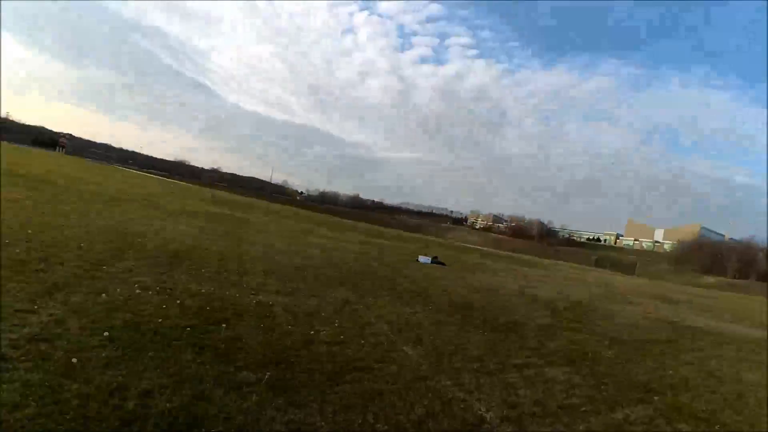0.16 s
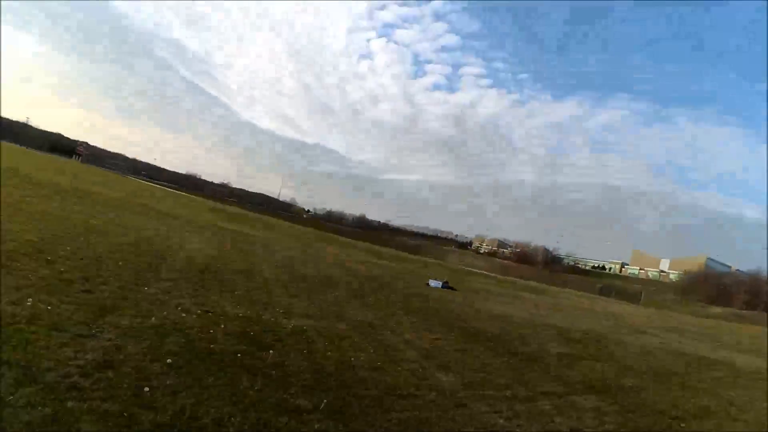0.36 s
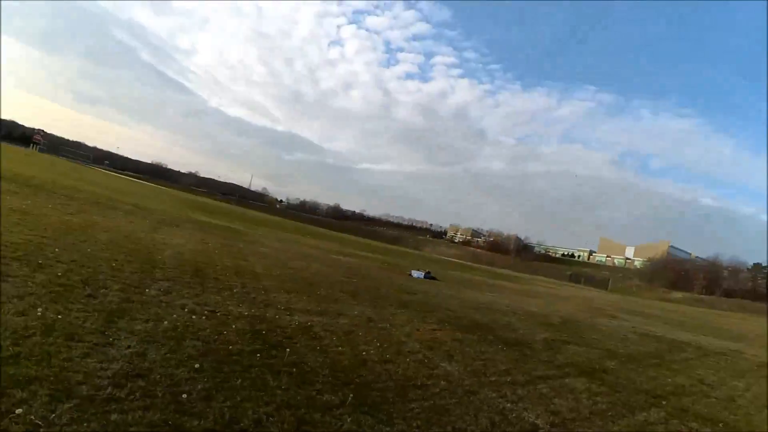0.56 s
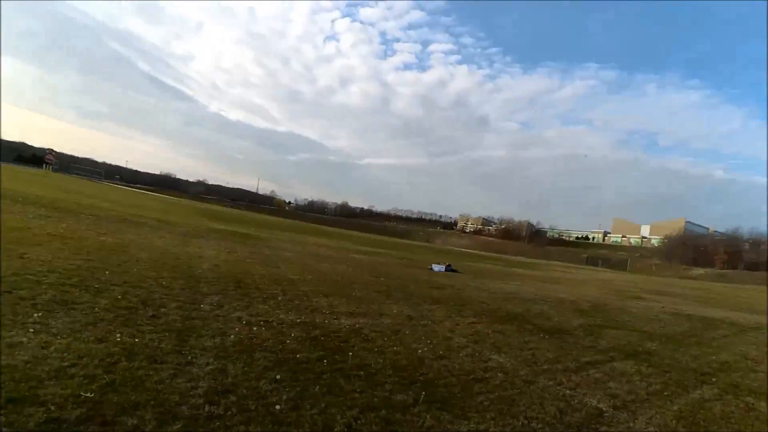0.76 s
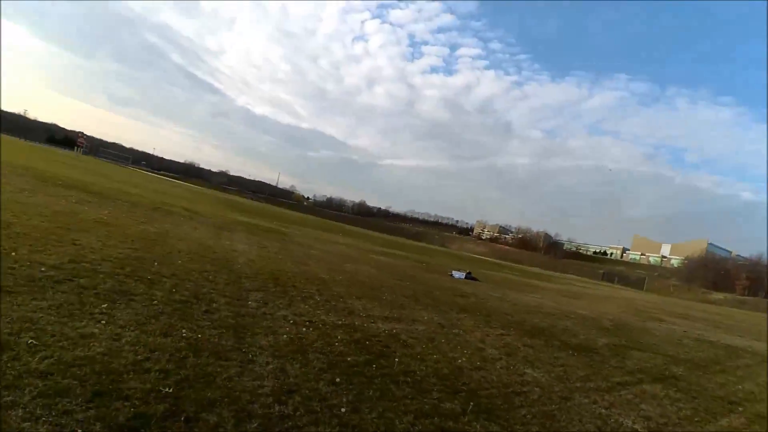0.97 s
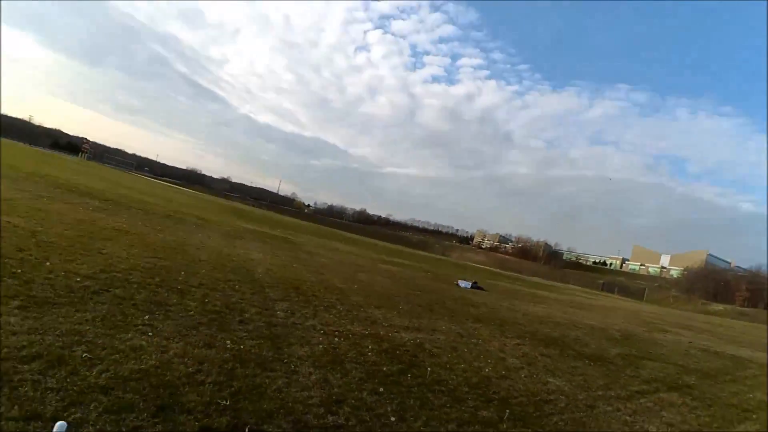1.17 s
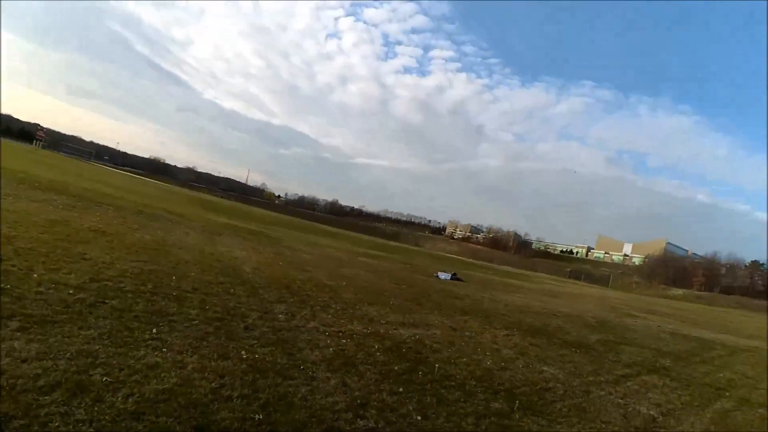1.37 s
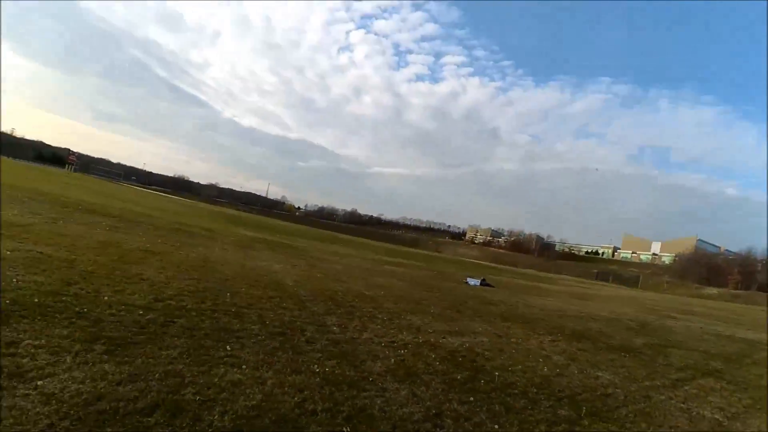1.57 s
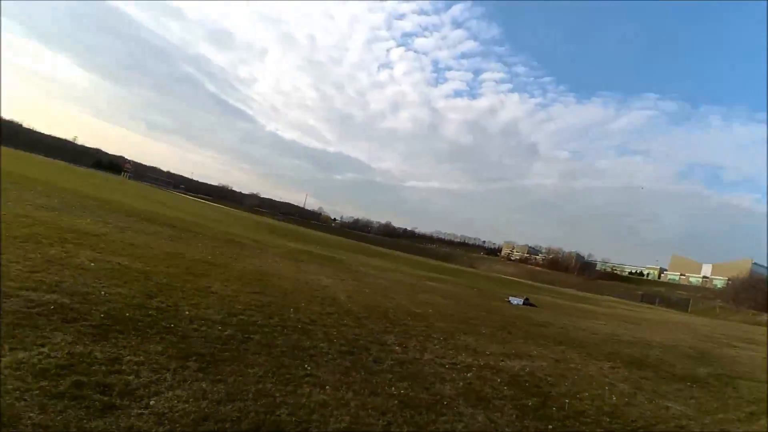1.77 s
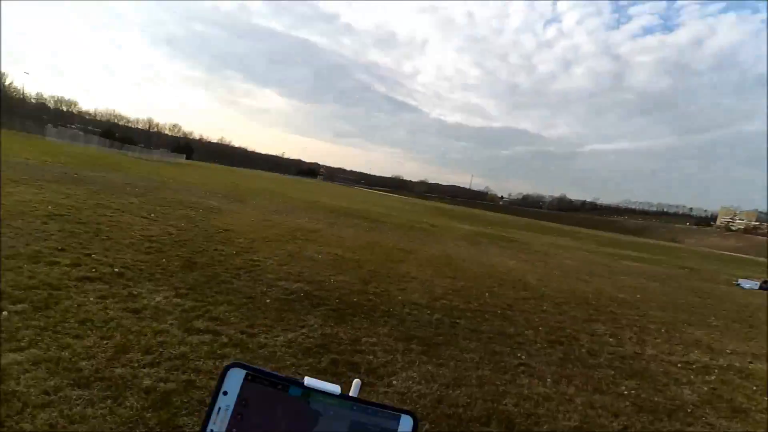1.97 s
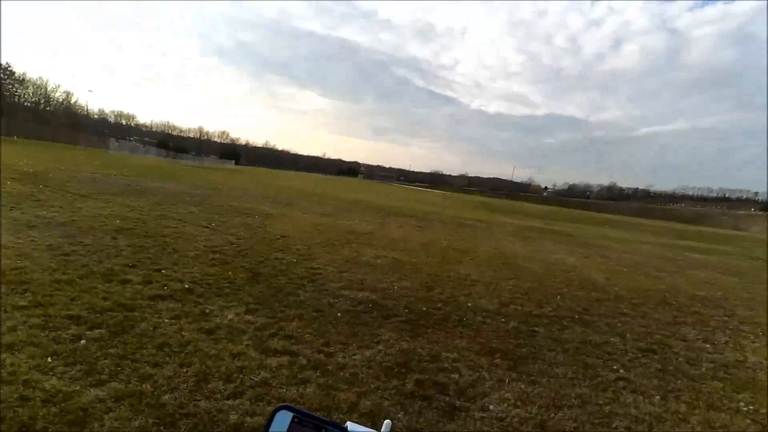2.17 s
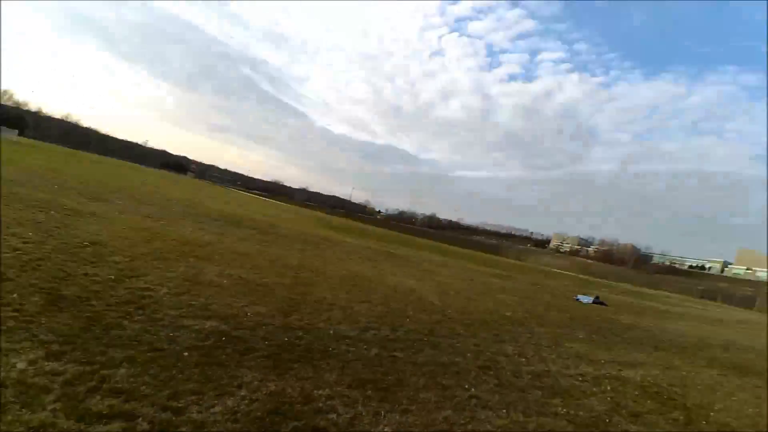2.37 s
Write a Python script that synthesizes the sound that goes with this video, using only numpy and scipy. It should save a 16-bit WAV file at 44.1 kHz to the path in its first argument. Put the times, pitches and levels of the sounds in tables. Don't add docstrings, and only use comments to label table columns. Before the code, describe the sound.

Wind buffets a microphone with low rumble and sudden pops, as plastic gear clacks now and then

```python
import sys
import numpy as np
from scipy import signal
from scipy.io import wavfile
from scipy.ndimage import uniform_filter1d

SR = 44100
rng = np.random.default_rng(int(sys.argv[2]) if len(sys.argv) > 2 else 0)


def wav_out(sig):
    wavfile.write(sys.argv[1], SR, np.round(np.clip(np.atleast_2d(sig).T, -1, 1) * 32767).astype(np.int16))


def voltage_ratio(level):
    return 10 ** (np.asarray(level, float) / 20)


N = 110250

# (time [s], buffet level [dB], pressure sway level [dB])
GUSTS = [(0, -27, -32.5), (.1, -27, -43), (0.132, -32, -33), (.23, -32, -14), (.36, -38, -28.5),
         (0.398, -33, -16.5), (.63, -45, -23.5), (0.692, -26.5, -26.5), (.86, -27.5, -22),
         (0.899, -36.5, -21.5), (1.05, -25.5, -18), (1.332, -36, -27), (1.382, -26, -25),
         (1.579, -29.5, -16.5), (1.662, -35.5, -22), (1.732, -24.5, -23), (1.95, -35.5, -22.5),
         (2.052, -31.5, -29.5)]
# (time [s], buffet level [dB], pressure sway level [dB])
CLOSING_RUSH = [
    (2.073, -55, -26.5),
    (2.187, -54, -21),
    (2.21, -19.5, -5),
    (2.242, -27.5, -22),
    (2.273, -27, -28),
    (2.299, -22.5, -16.5),
    (2.42, -27, -25),
    (2.439, -43, -15.5),
    (2.5, -59.5, -24),
]
# (time [s], peak [dB], t60 [s], pitch [Hz])
POPS = [(0.014, -13, 0.073, 490), (0.04, -8, 0.071, 362), (0.088, -13, 0.037, 430),
        (0.214, -23.5, 0.015, 367), (0.23, -15, 0.026, 310), (0.379, -24, 0.023, 520),
        (0.399, -16.5, 0.026, 358), (0.46, -9, 0.025, 175), (0.684, -18, 0.095, 334),
        (0.754, -10.5, 0.03, 420), (0.817, -19, 0.022, 485), (0.845, -11.5, 0.075, 409),
        (1.002, -16, 0.037, 357), (1.039, -13.5, 0.044, 280), (1.067, -19, 0.015, 402),
        (1.118, -21, 0.03, 420), (1.387, -1, 0.022, 254), (1.436, -7, 0.012, 480), (1.476, -8, .037, 295),
        (1.554, -17.5, 0.077, 464), (1.719, -29, 0.041, 286), (1.986, -18, 0.032, 384),
        (2.032, -8.5, 0.013, 367), (2.047, -23, 0.023, 440), (2.211, -14.5, 0.31, 368),
        (2.231, -1, 0.037, 290), (2.237, -4, 0.026, 610), (2.286, 2.5, 0.055, 362), (2.333, -2, 0.033, 367),
        (2.364, -4.5, 0.043, 540), (2.415, -14, 0.023, 446),
        (0.002, -18, 0.034, 130), (0.264, -13, 0.1, 98), (0.423, -45, 0.02, 280),
         (0.573, -19.5, 0.085, 243), (0.655, -17.5, 0.088, 151), (0.713, -11.5, 0.049, 324),
         (0.789, -28, .05, 109), (0.986, -19.5, 0.14, 179), (1.155, -12, 0.06, 90),
         (1.341, -14, 0.033, 150), (1.407, -11, 0.069, 125), (1.445, -22, 0.074, 60),
         (1.919, -15, .06, 59.3), (1.626, -15, .03, 340), (1.04, -18, .05, 65), (1.511, -21, 0.046, 300),
         (1.582, -18.5, 0.035, 433), (1.685, -30, 0.077, 140), (1.759, -15, 0.029, 225),
         (1.81, -11.5, 0.11, 116), (1.899, -14.5, 0.12, 69.4), (2.009, -18, 0.099, 144),
         (2.222, -17, 0.047, 247), (2.274, -10, 0.01, 320), (2.303, -9, 0.11, 226),
         (2.295, -4.5, 0.028, 773), (2.306, -6, 0.038, 433), (2.324, -9, 0.073, 310),
         (2.355, -26, 0.026, 272), (2.386, -22, 0.069, 276), (2.402, -11, 0.019, 296),
         (0.232, -15.5, 0.042, 117), (0.526, -31, 0.056, 810), (2.22, -17, .03, 750)]
# (frequency [Hz], density [dB per Hz])
BUFFET_COLOUR = [(32, -38.5), (48, 10.5), (90, 5.5), (167, 1.5), (210, 0), (366, -12.5), (698, -54),
                 (875, -47), (2000, -46.5), (2600, -80)]
# (time [s], peak [dB], tilt [dB per octave], t60 [s])
CLACKS = [(0.2713, -28.5, -5, 0.013), (0.3174, -13.5, 3.5, 0.02), (0.3318, -23.5, 0.1, 0.018),
          (0.4985, -31, -7.5, 0.0099), (0.5013, -30, 1, 0.021), (0.5054, -41.5, -3.5, 0.051),
          (0.573, -27.5, -2, 0.021), (0.5958, -32.5, 0, 0.03), (0.9761, -23.5, -4, 0.022),
          (1.0067, -19, 0.5, 0.022), (1.052, -31, -4.2, 0.019), (1.285, -32, -5.5, 0.024),
          (1.3049, -32, -5, 0.044), (1.6512, -38.5, -3, 0.025), (1.6856, -29.5, -2.5, 0.035),
          (1.7469, -19.5, 2, 0.016), (1.7564, -35.5, -5, 0.053), (1.8105, -39.5, -2.5, 0.021),
          (2.0135, -34.5, -5.5, 0.043), (2.0254, -37, -3, 0.027), (2.398, -29, -0.5, 0.027),
          (2.4448, -33.5, -1, 0.032)]
# (time [s], peak [dB], tilt [dB per octave])
TICKS = [(0.012, -42.5, 0), (0.227, -60, -9), (1.315, -43, 9), (1.478, -48, -2), (0.216, -40.5, -4),
         (0.2585, -42, -7.5), (0.2612, -33, -4.5), (0.2675, -35.5, 0), (0.448, -48.5, 20.5),
         (0.446, -41, -3.5), (0.534, -40, 7), (0.54, -45, 7), (0.7567, -40.5, -1.5), (0.934, -43, -4),
         (0.9674, -34, -1), (0.9893, -55, -18), (1.1546, -40.5, 3), (1.2452, -34.5, 4.5),
         (1.358, -54.5, 19), (1.3902, -47, 5), (1.4406, -42, -1.5), (1.6405, -41, -3.5), (1.6947, -49, 0),
         (1.79, -45, -1), (1.839, -52, -10), (2.2772, -42, -11), (2.356, -36.5, 2), (2.4096, -39, -5),
         (2.4974, -42, -3)]
# (frequency [Hz], density [dB per Hz])
GEAR_COLOUR = [(710, -32), (1200, 1), (1670, -2), (2510, -4), (2860, 2.5), (4830, -3.5), (5730, 0),
               (13500, -16), (15500, -33)]
# (frequency [Hz], level [dB], t60 [s])
SHELL_MODES = [(1686, -10, 0.0068), (2380, -57.5, 0.0067), (2934, -18, 0.011), (3246, -24, 0.023),
               (4330, -27.5, .02), (5390, -17.5, 0.008), (6120, -14, 0.0049), (8750, -12.5, 0.0011)]
# (time [s], peak [dB], t60 [s])
SWISHES = [(0.0, -46, .05), (0.5, -49, 0.14), (0.6, -65, 0.27), (0.97, -47, 0.16), (1.3, -52, 0.086),
           (1.5, -64, 0.51), (1.76, -60, 0.44), (1.96, -51, 0.25), (2.07, -64.5, 0.36), (1.82, -66, 0.26),
           (1.65, -55, .15), (2.46, -54, 0.23), (2.494, -44, .05)]
# (frequency [Hz], density [dB per Hz])
FIELD_COLOUR = [(290, -26), (500, 6.5), (706, 2.5), (1070, -5.5), (2760, -13), (5670, -18), (6270, -18),
                (12300, -25.5), (15500, -69)]
# (frequency [Hz], width [Hz], level [dB])
WHISTLES = [(5550, 170, -78), (5810, 140, -77)]


def rms_one(x):
    return x / np.sqrt(np.mean(x ** 2) + 1e-20)


def at_hz(points, hz):
    table_hz, table_db = np.array(points).T
    return np.interp(np.log(hz), np.log(table_hz), table_db)


def drift(rate_hz):
    r = np.exp(-16 * np.pi * rate_hz / SR)
    slow = signal.lfilter([1], [1, -2 * r, r * r], rng.standard_normal(N // 8 + 4002))[4000:]
    return np.interp(np.arange(N) / 8, np.arange(len(slow)), rms_one(slow - slow.mean()))


def butter(x, hz, kind, order=2):
    return signal.sosfilt(signal.butter(order, hz, kind, fs=SR, output="sos"), x)


def resonance(x, hz, width_hz):
    r = np.exp(-np.pi * width_hz / SR)
    zeros = np.array([1, 0, -1]) * (1 - r * r) / 2
    return signal.lfilter(zeros, [1, -2 * r * np.cos(2 * np.pi * hz / SR), r * r], x)


def bands(low_hz, count):
    edges = np.minimum(low_hz * 2 ** (np.arange(count + 1) / 2), SR / 2.4)
    return [([a, b], np.sqrt(a * b)) for a, b in zip(edges, edges[1:])]


def bursts(s, db, t60, rise_s=1e-4):
    out, t = np.zeros(N + SR), np.arange(SR // 5) / SR
    for start_s, level_db, t60_s in zip(s, db, t60):
        i = int(start_s * SR)
        decay = voltage_ratio(level_db - 60 * t / max(t60_s, 1e-3))
        out[i:i + len(t)] += decay * (1 - np.exp(-t / rise_s))
    return out[:N]


def wind():
    lull_db, port_top_hz = -43, 1300
    s, buffet_db, sway_db = np.transpose(GUSTS + CLOSING_RUSH)
    t = np.arange(N) / SR
    buffet_db, sway_db = np.interp(t, s, buffet_db), np.interp(t, s, sway_db)
    flutter = drift(36.6)
    buffet = buffeting(buffet_db, flutter)
    popping, strength = pops()
    shedding = voltage_ratio(np.minimum(buffet_db - lull_db, 0))
    port = butter((buffet + popping) * shedding, port_top_hz, "low", order=4)
    return port + sway(sway_db, flutter) + spray(strength, buffet)


def buffeting(buffet_db, flutter):
    level_db, brighter_per_octave = 5, 0.32
    flutter_db, own_flutter_db, flutter_hz = 0.5, 4, 36.6
    mean_db = buffet_db.mean()
    swing_db = buffet_db - mean_db + flutter_db * flutter
    white = eddies()
    out, power = 0, 0
    for k, (edges, hz) in enumerate(bands(35.29, count=11)):
        bright = 1 + brighter_per_octave * (1 + np.log2(hz / 300))
        band = voltage_ratio(at_hz(BUFFET_COLOUR, hz)) * butter(white[k % 2], edges, "band")
        power += np.mean(band ** 2)
        out = out + band * voltage_ratio(bright * swing_db + own_flutter_db * drift(flutter_hz))
    return voltage_ratio(mean_db + level_db) * out / np.sqrt(power)


def eddies():
    eddies_per_s, spread_db, smooth_share = 600, 3.2, 0.6
    sizes = voltage_ratio(spread_db * np.minimum(rng.exponential(1, N), 4)) * rng.choice([-1, 1], N)
    grains = rms_one(sizes * (rng.random(N) < eddies_per_s / SR))
    return grains + smooth_share * rng.standard_normal((2, N))


def pops():
    level_db, kick_db, rise_s = -7.5, -6.5, 0.003825
    width_share, top_share = 0.83, 1.91
    events = POPS
    out, strength = np.zeros(N + SR), np.zeros(N + SR)
    white = rng.standard_normal((len(events), SR // 5))
    for (s, db, t60_s, hz), noise in zip(events, white):
        i = int(s * SR)
        envelope = bursts([0], [db + level_db], [t60_s], rise_s)[:len(noise)]
        narrow = 400 / hz
        drive = 6.8 * np.sqrt(narrow) * envelope * noise
        drive[int(rise_s * SR)] += narrow * voltage_ratio(db + kick_db + 34)
        puff = butter(drive, hz * top_share, "low")
        for _ in range(2):
            puff = resonance(puff, hz, hz * width_share)
        out[i:i + len(puff)] += puff
        strength[i:i + len(puff)] += envelope
    return out[:N], strength[:N]


def sway(sway_db, flutter):
    level_db, flutter_db = -3, 1
    low_hz, top_hz, tilt_hz = 6, 29, 9
    x = butter(rng.standard_normal(N + SR), low_hz, "high")
    x = butter(x, top_hz, "low", order=4)
    x = rms_one(butter(x, tilt_hz, "low", order=1)[SR:])
    x = rms_one(x / uniform_filter1d(x ** 2, size=5000) ** 0.25)
    return x * voltage_ratio(level_db + sway_db + flutter_db * (drift(13.0) + 0.11 * flutter))


def spray(strength, buffet):
    level_db, power, tilt, low_hz = -37.5, 1.63, 0.33, 1200
    hiss = butter(signal.lfilter([1], [1, -tilt], rng.standard_normal(N)), low_hz, "high")
    force = strength + 0.81 * uniform_filter1d(np.abs(buffet), size=400)
    return voltage_ratio(level_db) * force ** power * hiss


def gear():
    level_db, patchy_db, grit_db, tick_t60_s = -8, 4.5, 1.5, 0.028
    crack_t60_s, crack_rise_s, lows_last_longer = 0.0044, 0.0008, 0.21
    tail_db, tail_rise_s = -5.5, 0.0029
    rustle_db, rustle_t60_s, rustle_swell_s, rustle_tilt_db = -22, 0.41, 0.013, -9
    s, db, tilt, t60 = np.transpose(list(CLACKS) + [(*tick, tick_t60_s) for tick in TICKS])
    patches_db = patchy_db * rng.standard_normal((len(s), 8))
    white = rng.standard_normal((2, N)) * voltage_ratio(grit_db * rng.standard_normal(N))
    rustle = bursts(s, db / 2 - 26.0 + rustle_db, 0 * s + rustle_t60_s, 0.0015)
    rustle = uniform_filter1d(rustle, size=int(rustle_swell_s * SR))
    out, power = 0, 0
    for k, (edges, hz) in enumerate(bands(1203, count=8)):
        band_db = db + patches_db[:, k] + tilt * np.log2(hz / 5000)
        longer = (hz / 5000) ** -lows_last_longer
        crack = bursts(s, band_db, 0 * s + crack_t60_s * longer, crack_rise_s)
        tail = bursts(s, band_db + tail_db, t60 * longer, tail_rise_s)
        shape = crack + tail + rustle * voltage_ratio(rustle_tilt_db * np.log2(hz / 3000))
        colour_db = at_hz(GEAR_COLOUR, hz)
        out = out + voltage_ratio(colour_db) * butter(white[k % 2] * shape, edges, "band")
        power += voltage_ratio(2 * colour_db) * (edges[1] - edges[0]) / SR * 2
    return voltage_ratio(level_db) * out / np.sqrt(power) + shell(s, db, tilt)


def shell(s, db, tilt):
    spread_db = 1
    out, luck = 0, rng.standard_normal((len(s), len(SHELL_MODES)))
    for (hz, mode_db, t60_s), mode_luck in zip(SHELL_MODES, luck.T):
        clicks = np.zeros(N) + 1e-18
        hit_db = db + mode_db + tilt * np.log2(hz / 5000) + spread_db * mode_luck
        clicks[(s * SR).astype(int) + 8] = voltage_ratio(hit_db)
        r, w = voltage_ratio(-60 / (t60_s * SR)), 2 * np.pi * hz / SR
        out = out + signal.lfilter([0, np.sin(w)], [1, -2 * r * np.cos(w), r * r], clicks)
    return out


def swish():
    rise_s, low_hz, top_hz, blades_per_s = 0.041, 900, 3000, 1500
    grains = rng.standard_normal(N) * (rng.random(N) < blades_per_s / SR)
    grains = butter(butter(grains, low_hz, "high"), top_hz, "low", order=1)
    return rms_one(grains) * bursts(*np.transpose(SWISHES), rise_s)


def field():
    level_db, patchy_db, patchy_hz = -62, 1.2, 9.8
    white = rng.standard_normal((2, N))
    hiss = 0
    for k, (edges, hz) in enumerate(bands(361, count=11)):
        band_db = at_hz(FIELD_COLOUR, hz) + patchy_db * drift(patchy_hz)
        hiss = hiss + voltage_ratio(band_db) * butter(white[k % 2], edges, "band")
    return voltage_ratio(level_db) * rms_one(hiss)


def whistles():
    flicker_db, flicker_hz, end_s = 2.5, 4, 2.17
    out = 0
    for hz, width_hz, db in WHISTLES:
        tone = resonance(resonance(rng.standard_normal(N), hz, width_hz), hz, width_hz)
        out = out + voltage_ratio(db + flicker_db * drift(flicker_hz)) * rms_one(tone)
    return out * np.clip((end_s - np.arange(N) / SR) * 20, 0.3, 1)


def scene():
    treble_db, treble_hz, bass_db, bass_hz = -22.5, 11000, -36, 45
    air = wind()
    bright = gear() + swish() + field() + whistles()
    side = voltage_ratio(treble_db) * butter(np.roll(bright, 40), treble_hz, "high", order=1)
    side = side + voltage_ratio(bass_db) * butter(np.roll(air, 900), bass_hz, "low", order=1)
    return air + bright + side * np.array([[1], [-1]])


def top_cut(x):
    return signal.sosfilt(signal.butter(12, 15820, fs=SR, output="sos"), x)


def record(dry):
    top_hz = 15300
    mix = signal.sosfilt(signal.ellip(8, 0.3, 50, top_hz, fs=SR, output="sos"), dry)
    return top_cut(mix)


dry = scene()
out = record(dry)
wav_out(out)
```